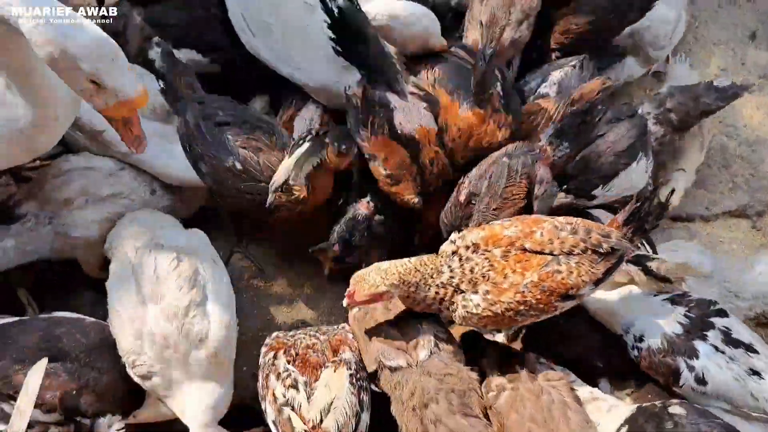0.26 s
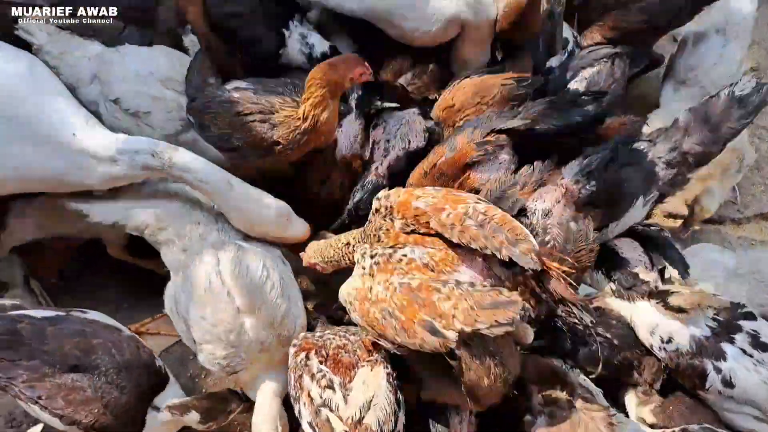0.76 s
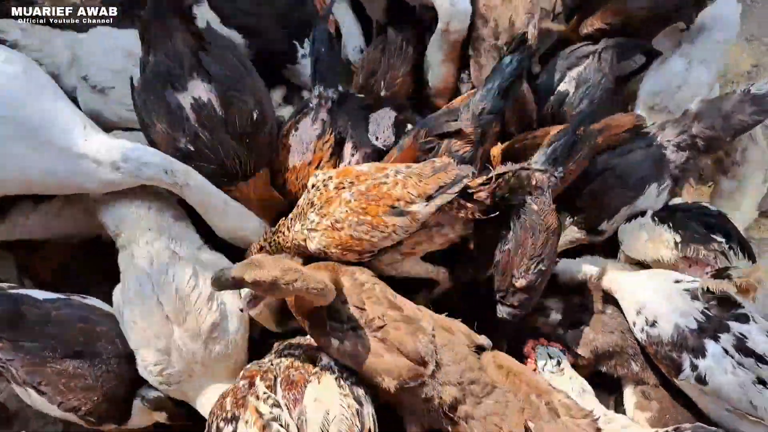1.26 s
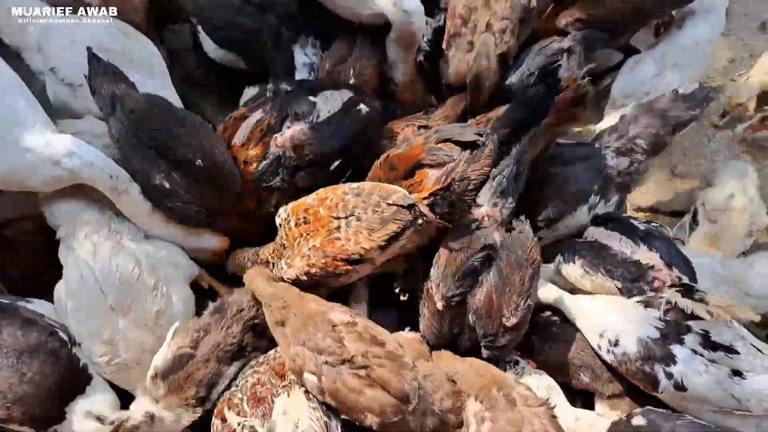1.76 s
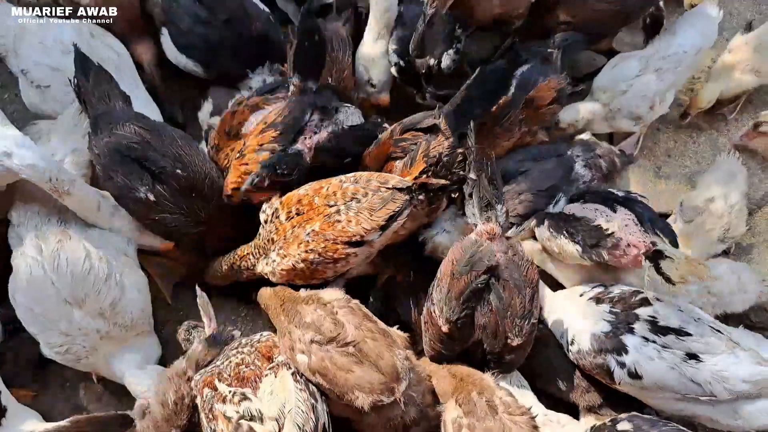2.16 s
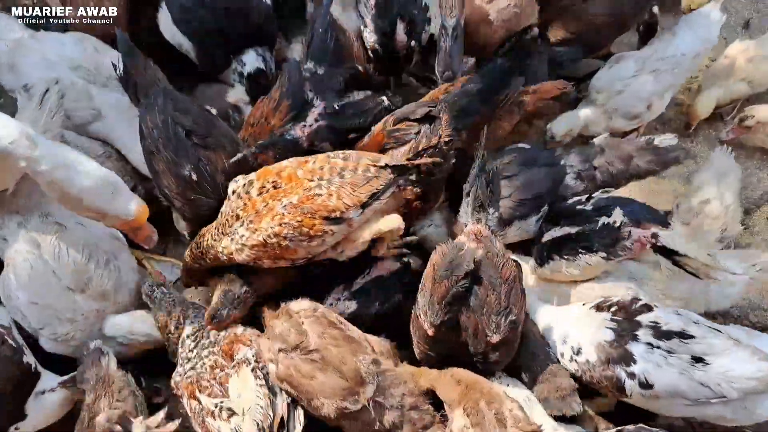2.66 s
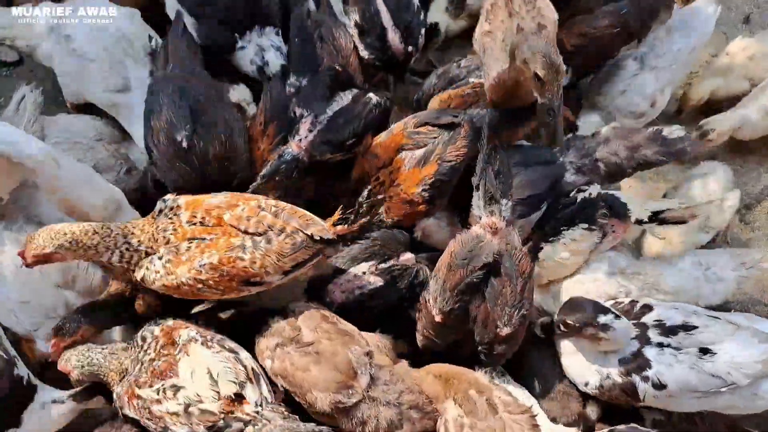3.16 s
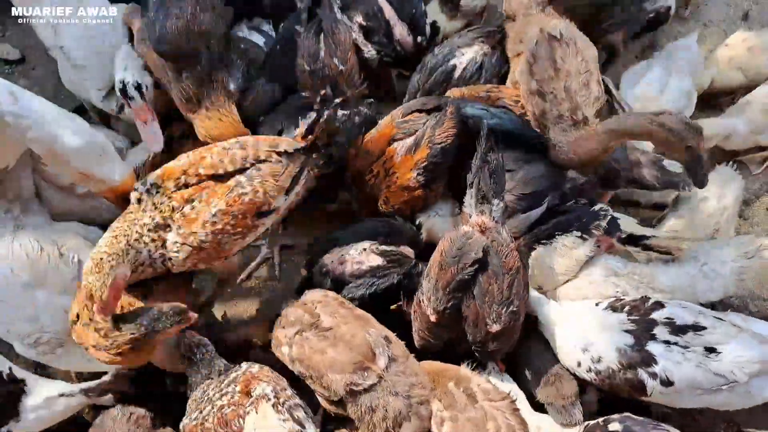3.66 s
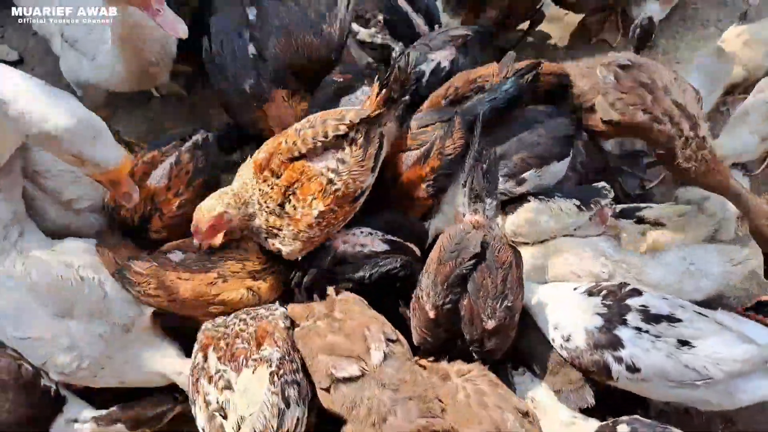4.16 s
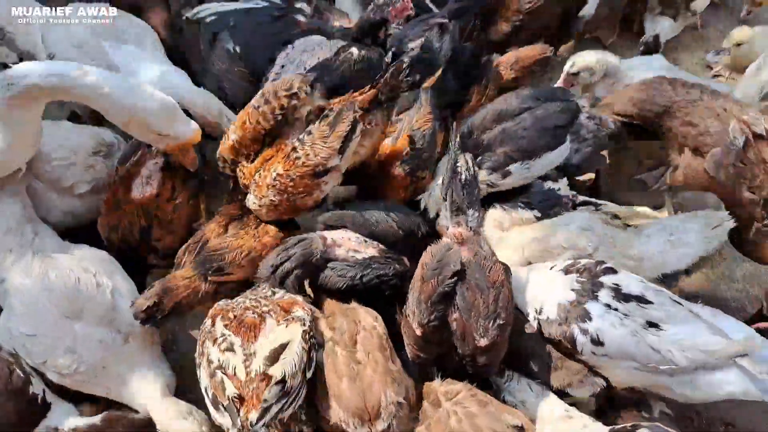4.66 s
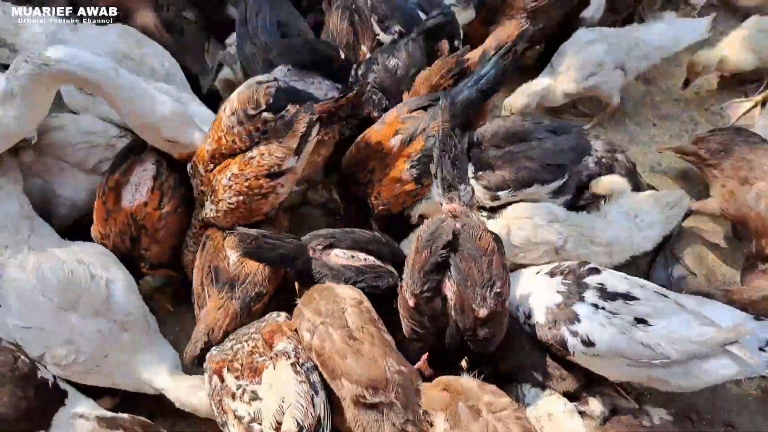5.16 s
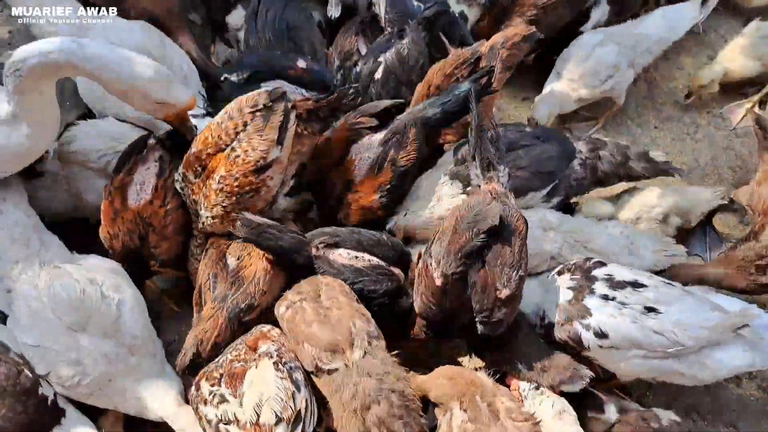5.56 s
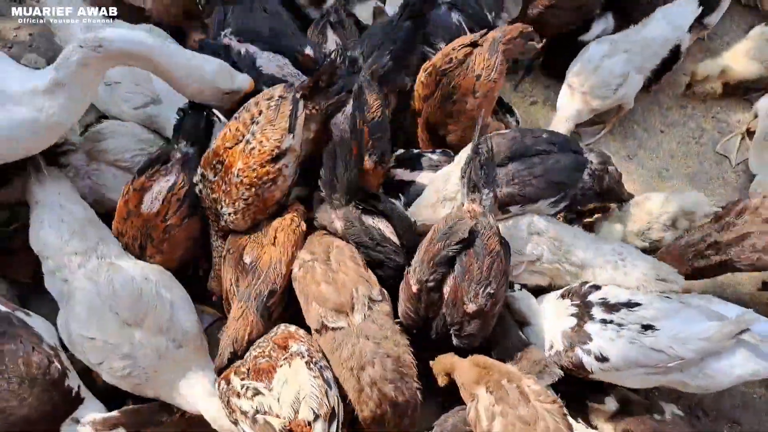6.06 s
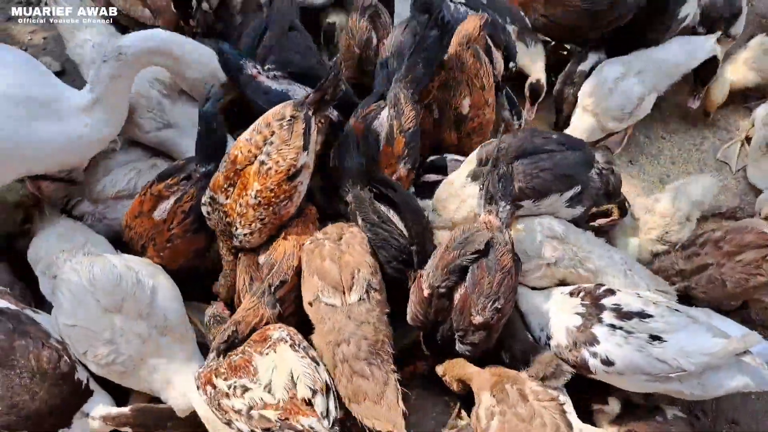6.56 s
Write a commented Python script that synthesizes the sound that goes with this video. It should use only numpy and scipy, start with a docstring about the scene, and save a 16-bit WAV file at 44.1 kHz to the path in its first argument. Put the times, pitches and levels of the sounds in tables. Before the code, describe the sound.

In a walled outdoor yard, a tight crowd of chickens and ducks feeds close to a stereo microphone. From 0 s, rapid tiny beak ticks and sharper pecks run over a soft murmur of birds, shuffling feet, grainy feed rustle and low rumble; a faint engine hum comes and goes. Short gliding peeps and chirps scatter from the start, with small low clucks at 0.6 and 0.8 s and a stronger one near 1.6 s. Four soft wing puffs flutter from 1.7 to 2.0 s, a weaker one at 2.3. Bright peeps cluster near 2.7 s, then three loud, hoarse clucks sound at 2.95, 3.1 and 3.25 s. Strong pecks with dull thuds and dense chirping fill 3.5 to 4.9 s. Afterwards it thins: peeps are quieter, mild clucks sound near 5.4 and 5.8 s, and pecks continue at 5.9 and 6.3 s, ending around 6.8 s amid steady rustling.

```python
"""Poultry feeding in a walled yard

Chickens, ducks, chicks and sparrows: calls and clucks are gliding harmonic tones blurred by roughness, with leaked air.
Beaks tick as decaying noise and tones, and wings beat as puffs of noise. Bustle is shaped noise: a far rumble,
a murmur of flock and feet, and a rustle in the feed; a far engine hums as one wavering tone.
The yard walls smear calls, ticks and wing beats with decaying noise tails."""
import sys
import numpy as np
from scipy import signal
from scipy.fft import rfft, irfft, next_fast_len
from scipy.io import wavfile
from scipy.ndimage import uniform_filter1d, map_coordinates

SR = 44100
rng = np.random.default_rng(int(sys.argv[2]) if len(sys.argv) > 2 else 0)


def transcribe(u):
    """Save the signal u as a 16-bit wav file named by the first command-line argument.

    u: samples, shape (n,) or (channels, n), limited to [-1, 1]; the rate is SR.
    q: integer samples, one column per channel.
    """
    v = np.clip(np.atleast_2d(u).T, -1, 1)
    q = np.round(v * 32767).astype(np.int16)
    wavfile.write(sys.argv[1], SR, q)


N = 299880  # samples, 6.8 s


def amp(db):
    """Decibel law: 20 dB is a tenfold amplitude."""
    return 10 ** (np.asarray(db) / 20)


def unit(x):
    """Energy normalization: scales a signal to rms 1."""
    return x / np.sqrt(np.mean(x ** 2) + 1e-20)


def along(points, hz):
    """Logarithmic frequency scale: interpolates (f/Hz, value) points along it."""
    f, v = np.transpose(points)
    return np.interp(np.log(hz + 1), np.log(f + 1), v)


def wobble(rate):
    """Band-limited random motion: a smooth curve through `rate` random knots a second."""
    knots = rng.standard_normal(int(N * rate / SR) + 4)
    return map_coordinates(knots, [np.arange(N) * rate / SR])


def filtered(x, response):
    """Linear filtering: the spectrum is multiplied by a complex response of frequency."""
    m = next_fast_len(N + SR // 2)
    hz = np.fft.rfftfreq(m, 1 / SR)
    return irfft(rfft(x, m) * response(hz), m)[..., :N]


def hiss(spectrum):
    """Turbulence as spectrally shaped white noise: mono, rms 1."""
    return unit(filtered(rng.standard_normal(N), lambda hz: amp(along(spectrum, hz))))


def rush(spectrum, patchy_db):
    """Diffuse field: stereo noise of rms 1 with set channel correlation and patches of random gain."""
    # left-right correlation of diffuse sound: f/Hz, correlation (-1 to 1)
    likeness = [(60, 0.75), (240, 1), (950, 0.49), (3770, -0.028), (15000, 0.11)]
    z = signal.stft(rng.standard_normal((2, N)), nperseg=512)[2]
    field = rng.standard_normal(z.shape[1:])
    field = uniform_filter1d(field, size=10, axis=0)  # over frequency
    field = uniform_filter1d(field, size=8, axis=1)  # over time
    pair = signal.istft(z * amp(patchy_db * unit(field)), nperseg=512)[1][:, :N]

    def mid_side_response(hz):
        # mid and side powers cos^2 and sin^2 differ by the wanted correlation
        turn = np.arccos(np.clip(along(likeness, hz), -1, 1)) / 2
        return amp(along(spectrum, hz)) * [np.cos(turn), np.sin(turn)]

    mid, side = filtered(pair, mid_side_response)
    return unit(np.array([mid + side, mid - side]))


def add(out, s, sound, pan_db):
    """Superposition with a level difference: adds a sound at time s, panned by left-minus-right dB."""
    at = round(s * SR)
    piece = out[:, at:at + sound.shape[-1]]
    piece += amp([[pan_db / 2], [-pan_db / 2]]) * sound[..., :piece.shape[1]]


def hum():
    """Frequency modulation: a far engine near 64 Hz wavers, comes and goes, alike at both ports."""
    # course of the engine tone: t/s, peak level/dB
    engine_level = [(0.0, -85), (0.44, -52.5), (1.31, -50), (1.38, -65), (2.61, -60), (4.13, -58),
                    (5.02, -78), (5.61, -52), (5.68, -75), (6.04, -49), (6.44, -61), (6.8, -52)]
    phase = 2 * np.pi * np.cumsum(64 + 2.95 * wobble(5.8)) / SR
    level_db = np.interp(np.arange(N) / SR, *np.transpose(engine_level))
    return amp(level_db) * np.sin(phase)


def bustle():
    """Incoherent sum of many small sources: far rumble, flock murmur and grainy rustle of feet in the feed."""
    # course of the three noises: t/s, relative rumble level/dB, murmur level/dB, rustle level/dB
    course = [(0.0, -58, -56.5, -64), (0.53, -52, -50.5, -56.5), (2.01, -58, -50, -63.5),
              (4.3, -57, -50.5, -58.5), (4.751, -56.5, -52.5, -62.5), (6.8, -56.5, -52, -64.5)]
    # noise spectra: f/Hz, relative level per Hz/dB; the murmur is the far flock and feet
    rumble_spectrum = [(24, -55), (34, 5), (45, -4.5), (100, -3.5), (200, 1.5), (260, -24), (440, -120)]
    murmur_spectrum = [(71, -35), (120, -5), (332, 8), (929, -4), (1800, -8.5), (2420, -37), (3500, -10.5),
                       (4550, -17), (7700, -120)]
    rustle_spectrum = [(1180, -6), (2000, -0.5), (2490, 1), (3740, -13.5), (7440, -4.5), (9250, -17),
                       (13800, -9), (14900, -24), (16000, -12)]
    s, *columns = np.transpose(course)
    rumble_db, murmur_db, rustle_db = [np.interp(np.arange(N) / SR, s, c) for c in columns]
    jostle = wobble(9)  # murmur and rustle swell together
    rumble = amp(rumble_db + 1.5) * rush(rumble_spectrum, patchy_db=2.0)
    murmur = amp(murmur_db + 3.0 + jostle) * rush(murmur_spectrum, patchy_db=3.0)
    grains = unit(amp(0.9 * jostle + 0.8 * wobble(500)))
    rustle = amp(rustle_db + 8.0) * grains * rush(rustle_spectrum, patchy_db=1.8)
    return rumble + murmur + rustle


def nibbles(count=170):
    """Damped resonance: small ticks of many beaks picking grain, at random times and pitches."""
    out, t = np.zeros((2, N)), np.arange(SR // 100) / SR
    for when, high, loud, side in rng.random((count, 4)):
        level_db = -46.0 + 10.7 * loud - 60 * t / 0.018  # falls at 60 dB in 18 ms
        pitch_hz = 420 * 5.64 ** high
        tick = amp(level_db) * np.sin(2 * np.pi * pitch_hz * t)
        add(out, when * N / SR, tick, 12 * side - 7)
    return out


def pecks():
    """Impact: a click of horn as decaying noise, and a dull thud of the ground as a damped tone."""
    # beak ticks: t/s, relative click level/dB, relative thud level/dB, left minus right/dB
    ticks = [(.034, -41, -43, -1), (0.0877, -37, -54, -16), (0.219, -28, -44, 2), (.31, -26, -43, 3),
             (0.8906, -29, -60, -5), (0.9051, -40, -35.5, -3), (1.49, -31, -47, -11),
             (1.961, -57, -35.5, -2), (3.4834, -29, -37, 1), (3.7163, -23, -38, 0), (3.996, -26, -31.5, 1),
             (4.476, -33, -61, -9), (4.6712, -32, -29, -2), (4.905, -28, -34.5, 0),
             (5.2889, -26, -53, -4.5), (5.2996, -40, -46, -1), (5.315, -34, -49, -2),
             (5.9, -25.5, -36.5, 0), (6.33, -36, -41, -3)]
    out, t = np.zeros((2, N)), np.arange(SR // 20) / SR
    for s, db, thud_db, pan_db in ticks:
        dulled = signal.lfilter([1], [1, -.55], rng.standard_normal(len(t)))
        click = amp(db - 13.0 - 60 * t / 0.017) * dulled  # falls 60 dB in 17 ms
        thud_hz = rng.uniform(435, 688)
        thud = amp(thud_db + 6.0 - 60 * t / 0.015) * np.sin(2 * np.pi * thud_hz * t)
        add(out, s, click + thud, pan_db)
    return out


def wings():
    """Pulsed turbulence: each beat is a soft puff of feather noise that rises fast and dies away."""
    # wing beats: t/s, relative level/dB
    beats = [(1.692, -30.5), (1.789, -27.5), (1.881, -28.5), (2.002, -29), (2.277, -38)]
    # feather noise: f/Hz, relative level per Hz/dB
    feather_spectrum = [(88, -34), (150, -17), (327, -27), (365, -3.5), (500, -19), (634, 1.5),
                        (2000, -21.5), (2600, -45), (4400, -120)]
    out, air, t = np.zeros((2, N)), hiss(feather_spectrum), np.arange(SR // 6) / SR
    for s, db in beats:
        u = t / 0.0088  # the envelope peaks after 8.8 ms
        puff = u * np.exp(1 - u) * air[round(s * SR):][:len(t)]
        add(out, s, amp(db) * puff / 2, 0)
    return out


def voices(calls, air, air_db, upper_db, fade, jitter, blur_hz, alternate, pulsed, attack, release):
    """Harmonic source: partials glide on one arc, swell once and die; a rough throat blurs them and leaks air."""
    def shaky(rate):
        return (unit(wobble(rate)) + 1j * unit(wobble(rate))) / np.sqrt(2)

    out, drift, grain = np.zeros((2, N)), wobble(160), wobble(120)
    narrow = shaky(blur_hz)
    wide = np.array([shaky(2 * blur_hz), shaky(2 * blur_hz)])  # overtones scatter unlike to each port
    for s, length, first_hz, middle_hz, last_hz, db, peak, pan_db, second_db, third_db, rough in calls:
        at = np.arange(round((s - fade) * SR), min(round((s + length + fade) * SR), N))
        rough, peak = np.clip(rough, 0, 1), np.clip(peak, .05, .95)

        # a parabola through the three pitches
        u = np.clip((at / SR - s) / length, 0, 1)
        bend_hz = 2 * middle_hz - first_hz - last_hz
        arc = first_hz + (last_hz - first_hz) * u + bend_hz * 2 * u * (1 - u)
        phase = 2 * np.pi * np.cumsum(arc * (1 + jitter * rough * drift[at])) / SR

        # upper partials are set against the stronger of the second and third
        share = amp([0, second_db, third_db])
        upper = share[1:].max() * amp(upper_db)
        share = np.append(share, upper) / np.linalg.norm(share)

        v = np.clip((at / SR - s + fade) / (length + 2 * fade), 0, 1)
        swell = np.where(v < peak, (v / peak) ** attack, ((1 - v) / (1 - peak)) ** release)
        tone = 0
        for k, gain in enumerate(share):
            smear = min(rough * (1 + 0.47 * k), 1)  # overtones blur more than the fundamental
            blur = np.sqrt(1 - smear ** 2) + smear * (wide[:, at] if k else narrow[at])
            partial = np.sqrt(2) * np.imag(blur * np.exp(1j * (k + 1) * phase))
            tone = tone + gain * swell ** (0.071 * k) * partial  # overtones open up with the swell
        half_rate = np.sin(phase / 2)
        tone = tone * (1 + alternate * half_rate)  # strong and weak cycles take turns

        effort = rough * np.linalg.norm(share[1:])  # forced calls have strong overtones and leak most air
        leak = effort * amp(air_db + 2 * grain[at])
        puff = leak * air[at] * np.exp(pulsed * half_rate)  # air escapes at the strong cycles
        add(out, s - fade, amp(db) * swell * (tone + puff), pan_db)
    return out


def peeps():
    """Harmonic tones: whistles and chirps of chicks, ducklings and sparrows, low hen calls near 1 kHz,
    and bright throat resonances of loud clucks."""
    # calls: t/s, length without fades/s, first f/Hz, middle f/Hz, last f/Hz, level/dB,
    # loudest point/share of length, left minus right/dB, 2nd and 3rd partial re 1st/dB,
    # roughness (held within 0-1)
    calls = [(.07, 0.045, 2650, 2606, 2390, -46.5, 0.5, 5, -25, -25, 0.86),
             (.135, 0.053, 1825, 1777, 1245, -44.5, 0.75, -6, -16, -24, 0.41),
             (.225, 0.041, 2835, 2540, 2310, -35.5, 0.95, 0.5, -26, -22, 1),
             (.228, 0.066, 1457, 1760, 1910, -40.5, 0.27, -4, -17, -25, 1.07),
             (.27, 0.062, 2080, 2060, 1880, -37, 0.2, -0.5, -30, -23, 1.2),
             (.32, 0.016, 1780, 1433, 1170, -41.5, 0.44, -6, -17, -33, 0.47),
             (.35, 0.061, 2830, 2416, 1994, -32.5, 0.79, -0.5, -18.5, -14, 0.73),
             (.49, 0.043, 2710, 2450, 2160, -37.5, 0.8, 0, -17.5, -16, 0.85),
             (.58, 0.072, 2250, 2440, 2830, -39, 0.43, -3.5, -1.5, 0.5, 0.17),
             (.6, 0.042, 2490, 2386, 1960, -36.5, 0.87, 0, -20, -14, 1.03),
             (.79, 0.06, 2490, 1940, 2546, -38.5, 0.8, -1, -18, -18, 1.1),
             (.925, 0.039, 2890, 2470, 1850, -30, 0.48, 3, -38, -25, 0.35),
             (.92, 0.014, 1400, 1138, 880, -36.5, 0.56, -1, -7, -12, 0.44),
             (.967, 0.0184, 1036, 1230, 1300, -25.5, 0.7, -3, -23, -47, 0.26),
             (.99, 0.0113, 1460, 1800, 1850, -26.5, 0.36, -4, -21.5, -47, 0.33),
             (1.05, 0.035, 2910, 2670, 2160, -42.5, 0.83, 0, -20, -38, 0.44),
             (1.09, 0.033, 3090, 2840, 2360, -38, 0.85, 3, -25, -36, 0.74),
             (1.148, .11, 1583, 1603, 1179, -38, 1, -0.5, -14, -22, 0.32),
             (1.19, 0.045, 2865, 2714, 2410, -40, 1, 2, -23, -30, 0.5),
             (1.24, 0.027, 2960, 2900, 2940, -35.5, 0.55, 4, -24, -30, 0.26),
             (1.235, 0.038, 3550, 3140, 2980, -45.5, .2, -4, -4, -34, 0.55),
             (1.385, 0.11, 2357, 2343, 2330, -42, 0.06, 0, -17.5, -18, 1.1),
             (1.56, 0.086, 3280, 3384, 3740, -39.5, 0.93, 1.5, -0.5, -15, 0.72),
             (1.622, 0.035, 3100, 2540, 2290, -38, 0.9, 1, 0, -15, 0.65),
             (1.632, 0.094, 2290, 2301, 2264, -30, 0.53, -3, -14, -3, 0.25),
             (1.703, 0.022, 2400, 2830, 3300, -28.5, 0.64, -2.5, 16, -24, 0.46),
             (1.72, 0.084, 2232, 2138, 1960, -39.5, 0.5, -3, -15, 4, 0.54),
             (1.955, 0.067, 1622, 2570, 1650, -52, 0.64, -9, -20, -17, 0.42),
             (2.055, 0.074, 2400, 2954, 1755, -44, 0.76, -1, -19, -19, 0.2),
             (2.25, 0.11, 1258, 1258, 1216, -47.5, 0.54, -17, -21, -36, 1.1),
             (2.452, 0.07, 2830, 2380, 1715, -40, 0.8, -2.5, -21, -26, 0.17),
             (2.665, 0.064, 3395, 3155, 3245, -33, 0.93, -5, 1.5, -13, 0.68),
             (2.74, 0.15, 2552, 2539, 2412, -33.5, 0.1, -2, -12, -5.5, 0.19),
             (2.725, 0.036, 2970, 2810, 2470, -31, 1, 5.5, 4, -16, 0.07),
             (2.745, 0.054, 2546, 2270, 2150, -30, 0.16, -1.5, -35, -9, 0.58),
             (2.79, 0.077, 3040, 3184, 3186, -34, 0, -4.5, 22, -13, 0.47),
             (3.066, 0.032, 2770, 3310, 3380, -41, 0.5, -3, -19, -30, 0.5),
             (3.095, 0.023, 2580, 2720, 2820, -44, 0.3, -3, -28, -30, 0.4),
             (3.224, 0.039, 2560, 3280, 3350, -38, 0.17, 1, -25, -21, 0.6),
             (3.32, 0.061, 2090, 1820, 1570, -42, 0.37, -3, -24, -40, 0.76),
             (3.43, 0.078, 2465, 2560, 2470, -42.5, 0.8, 3, -12, -12, 0.9),
             (3.47, 0.045, 2590, 3014, 2470, -45.5, 0.78, -8, -10, -19, 1.13),
             (3.55, 0.17, 2020, 2024, 1980, -52.5, 0.77, -7, -18, -31, 0.08),
             (3.725, 0.082, 3200, 3100, 2926, -32, 0.75, -3.5, 4.5, -18, 0.54),
             (3.82, 0.12, 2010, 2015, 2000, -50, 0.1, -5, -27, -30, 0.2),
             (3.8, 0.13, 2610, 2415, 2450, -31.5, 0.18, -3, -3.5, -4.5, 0.38),
             (3.855, 0.08, 3550, 2697, 2724, -30, 0.26, 3, 18, -15, 0.46),
             (3.95, 0.041, 1187, 1303, 1460, -33, 0.3, -7, -14.5, -41, 0.9),
             (4.01, 0.041, 1006, 1193, 677, -28.5, 0.47, -7, -33, -32, 0.46),
             (4.092, 0.02, 995, 980, 900, -31.5, 0, -7, -14, -14, 1.2),
             (4.08, 0.092, 2350, 3026, 3410, -31, 0.08, 2.5, -17, -38, 0.38),
             (4.1, 0.077, 2480, 2206, 2046, -34, 0.67, -3, 11, 9, 0.74),
             (4.21, 0.066, 1926, 1950, 1905, -37.5, 0.23, -2, 9.5, 5.5, 0.78),
             (4.185, 0.042, 889, 1254, 810, -33.5, 0, -7, -9, -9, 0.85),
             (4.19, 0.031, 3390, 3280, 3060, -40.5, 0, -8, 15, -37, 0.53),
             (4.28, 0.045, 2546, 2306, 1920, -41, 0.8, -4, -5.5, -14, 0.45),
             (4.365, 0.052, 3410, 3210, 3000, -38, 0.1, -1.5, -5, -15, 1.13),
             (4.4, 0.069, 3070, 3103, 3170, -34, 0.23, 0.5, -18, -19, 0.56),
             (4.455, 0.11, 2595, 2054, 2057, -36, 0.19, -5, 8.5, -3.5, 0.45),
             (4.525, 0.035, 2684, 2920, 3270, -34, 1, -5.5, 17, -13, 0.34),
             (4.52, 0.039, 2950, 2500, 2440, -32.5, 0.5, 0, 4, -7, 0.06),
             (4.56, 0.055, 2570, 2553, 2180, -32.5, 0.82, 3.5, -10, -17, 0.95),
             (4.66, 0.041, 2660, 2410, 2280, -41, 0, 4, -27, -23, 0.73),
             (4.745, 0.075, 2025, 2693, 1780, -39.5, 0.93, -1, -21, -24, 0.42),
             (4.806, 0.12, 2250, 2820, 2100, -28, 0.84, 2, -22.5, -27, 0.18),
             (4.945, 0.031, 2875, 2400, 1740, -36.5, 0.37, -4, -39, -23, 0.3),
             (5.037, 0.018, 2370, 2140, 1920, -50, 0.1, -15, -31, -36, 0.3),
             (5.375, 0.024, 1200, 1255, 1150, -41.5, 0.5, -10, -31, -36, 0.54),
             (5.4, 0.07, 3150, 3290, 3240, -47.5, 1, -4.5, 9, -6, 0.7),
             (5.445, 0.13, 3405, 3733, 3006, -44, 0.82, 0.5, -8.5, -16, 0.54),
             (5.45, 0.19, 1823, 1914, 1890, -51.5, 0, 0, -8, 4, 0.3),
             (5.56, 0.037, 1287, 1332, 1397, -33, 0.5, -5.5, -17, -39, 0.93),
             (5.605, 0.046, 2610, 2483, 2306, -33.5, 0.2, 3.5, -16.5, -20, 0.68),
             (5.742, 0.053, 3450, 2910, 2300, -36.5, 0.9, 3, -22, -28, 0.1),
             (5.79, 0.0094, 1380, 1404, 1350, -36.5, 0.64, -5, -25, -36, 0.5),
             (5.925, 0.087, 1046, 1132, 1154, -46, 0.2, -7, -10, -25, 1.2),
             (6.03, 0.039, 2373, 2420, 2330, -38, 0.45, 2, -39, -26, 0.52),
             (6.03, 0.044, 1047, 1004, 1075, -42, 0.58, -8, -12, -28, 1.14),
             (6.075, 0.041, 3270, 3320, 3250, -42, 1, -4, 7, -3, 0.36),
             (6.08, 0.084, 2270, 2157, 2160, -41.5, 0.2, -1.5, -2.5, -18, 0.7),
             (6.1, 0.083, 2850, 2740, 2890, -39.5, 0.4, -3, -2.5, -6, 1.1),
             (6.31, 0.058, 2480, 2456, 2410, -51, 0.3, -3, -22, -30, 0.42),
             (6.49, 0.092, 990, 1050, 1007, -47, 0.13, -6, -5, -8, 0.5),
             (6.5, 0.037, 3470, 3210, 2900, -41, 1, 3.5, -12, -23, 0.7),
             (6.52, 0.049, 2715, 2480, 2240, -43.5, 0.2, -7, -32, -27, 0.1),
             (5.845, 0.049, 2710, 2900, 2840, -47.5, 0, -4, -25, -30, 0.5),
             (6.772, 0.055, 1150, 1175, 1170, -48, 0.6, -10, 4, -25, 0.2)]
    # air in a forced call: f/Hz, relative level per Hz/dB
    wheeze = [(1760, 9), (3000, 10.5), (6670, -0.5), (7890, 10.5), (8700, -19), (12900, 7), (15600, -53),
              (16000, -53)]
    return voices(calls, hiss(wheeze), air_db=-5.0, upper_db=[-17, -18], fade=.006, jitter=0.0303,
                  blur_hz=399.0, alternate=0, pulsed=0, attack=0.56, release=0.68)


def clucks():
    """Subharmonic modulation: short low notes, rich in overtones, turn hoarse as cycles alternate."""
    # clucks and croons: t/s, length without fades/s, first f/Hz, middle f/Hz, last f/Hz, level/dB,
    # loudest point/share of length, left minus right/dB, 2nd and 3rd partial re 1st/dB,
    # roughness (held within 0-1)
    calls = [(.345, 0.017, 293, 286, 280, -48, 0.54, -6, -11, -16, 1),
             (.63, 0.026, 418, 435, 430, -33.5, 0.96, 0.5, -21, 2, 0.22),
             (.82, 0.022, 426, 391.5, 376, -27.5, 0.65, 0.5, -7.5, -12, 0.21),
             (1.42, 0.01, 245, 257, 231, -41.5, 0.76, -2.5, 3, -19, 0.53),
             (1.576, 0.047, 268, 318.7, 433, -25.5, 0.57, 0, -4, -9, 0.27),
             (1.67, 0.26, 355, 361, 335, -42.5, 0.45, -3.5, -1, 2, 0.25),
             (2.04, 0.1, 350, 339, 328, -52, 0.33, -4, -21, -4, .15),
             (2.27, 0.036, 389, 383.5, 415, -38.5, 0.82, 0, -4, 2, 0.23),
             (2.506, 0.051, 369, 374.5, 304, -29.5, 0.86, 2, -9.5, -3.5, 0.18),
             (2.935, 0.011, 723, 711, 673, -31, 1, -3, 0, -18, 0.35),
             (2.949, 0.032, 635, 620.5, 605, -19, 0.51, 1.5, 11, 5.5, 0.2),
             (3.077, 0.011, 840, 827, 765, -29.5, 0.77, -7.5, -15, -13, 0.6),
             (3.092, 0.027, 661, 625, 610, -21.5, 0.22, 0.5, 1.5, -25, 0.35),
             (3.236, 0.011, 727, 680, 675, -31, 0.66, -6, -7, -13, 0.62),
             (3.25, 0.031, 623, 608, 580, -26.5, 0.17, -4, -5, -23, 1),
             (5.356, 0.035, 672, 736, 810, -38.5, 0.069, -4, -25, -39, 0.38),
             (5.393, 0.052, 771, 771, 630, -32, 0.4, -1, -20, -43, 0.68),
             (5.74, 0.063, 752, 857, 890, -38, 0.33, -3, -11, -28, 1),
             (5.81, 0.021, 458, 544, 523, -34, 0.52, -1, -3, -15, 0.17)]
    # hoarse part of a cluck: f/Hz, relative level per Hz/dB
    rasp = [(530, -13), (900, 3), (1900, -5.5), (2750, -6.5), (3400, -10.5), (4000, -23), (4700, -17.5),
            (5800, -28), (7770, -10.5), (8980, -28), (12100, -20), (16000, -43)]
    return voices(calls, hiss(rasp), air_db=3.5, upper_db=[-13, -14, -22], fade=.007, jitter=0.076,
                  blur_hz=140.6, alternate=0.18, pulsed=0.77, attack=0.41, release=0.91)


def yard(x):
    """Reverberation: each frequency decays at its own rate; a fresh random tail is drawn every quarter second."""
    # reverberation time for a 60 dB fall: f/Hz, t60/s
    decay = [(300, 0.16), (1200, 0.14), (2500, 0.22), (6000, 0.35), (12000, 0.22)]
    out, step = np.zeros((2, N + 2 * SR)), SR // 4
    delay = 200  # samples before the walls answer
    for at in range(0, N, step):
        hz, t, z = signal.stft(rng.standard_normal((2, SR // 2)), SR, nperseg=256)
        z[1] = np.where(hz[:, None] < 700, z[0], z[1])  # long waves are alike at both ports
        fall_db = -60 * t / along(decay, hz)[:, None]
        tail = signal.istft(z * amp(fall_db), SR, nperseg=256)[1]
        wet = signal.fftconvolve(x[:, at:at + step], tail / np.linalg.norm(tail[0]), axes=1)
        out[:, at + delay:at + delay + wet.shape[1]] += wet
    return out[:, :N]


def ports(x, lead_ms):
    """Interaural-style differences: the left port hears a sound sooner and differently coloured."""
    # colouring between the ports: f/Hz, left minus right/dB
    shade = [(500, -2), (1250, 4.5), (2500, -5), (5000, -13.5), (10000, -3.5)]
    side = np.array([[.5], [-.5]])  # half of each difference to either port

    def response(hz):
        lead = np.exp(2j * np.pi * hz * lead_ms / 1000 * side)
        return amp(along(shade, hz) * side) * lead

    return filtered(x, response)


def scene():
    """Direct-to-reverberant balance: the hens' clucks stand closest and sound driest."""
    far = peeps() + pecks() + nibbles()
    near = clucks() + wings()
    wet = yard(amp(-1.0) * far + amp(-4.5) * near)
    return ports(far + wet, lead_ms=0.15) + ports(near, lead_ms=0.35) + bustle() + hum()


def record(dry):
    """Band limiting: the bass thins below 40 Hz and nothing is kept from 15.9 kHz up."""
    top_hz, bass_hz = 15900, 40
    return filtered(dry, lambda hz: (hz < top_hz) / np.sqrt(1 + (bass_hz / (hz + 1)) ** 8))


dry = scene()
out = record(dry)
transcribe(out)
```